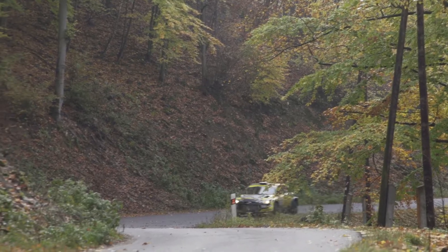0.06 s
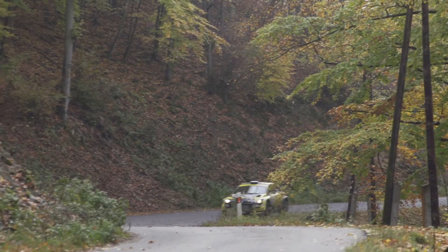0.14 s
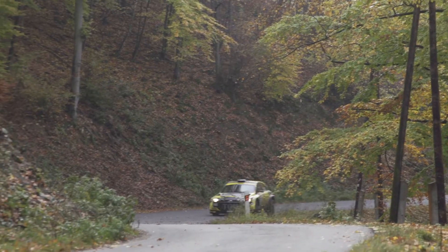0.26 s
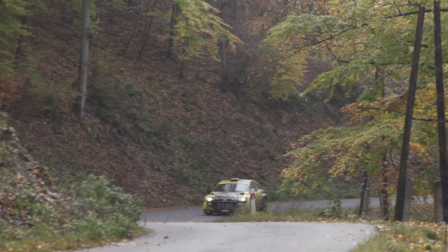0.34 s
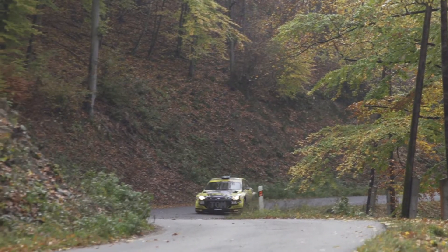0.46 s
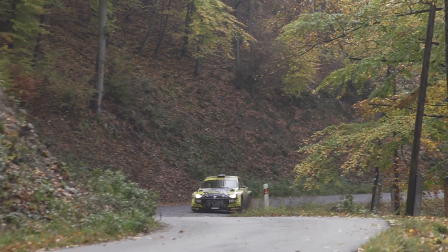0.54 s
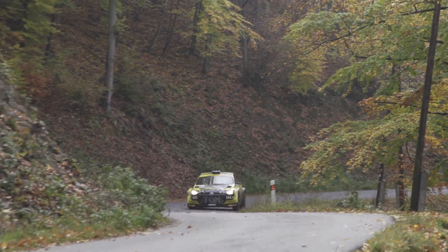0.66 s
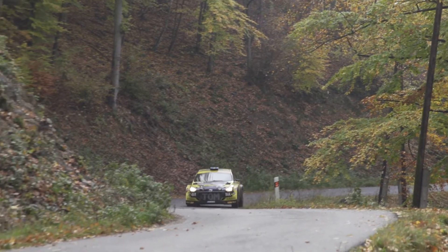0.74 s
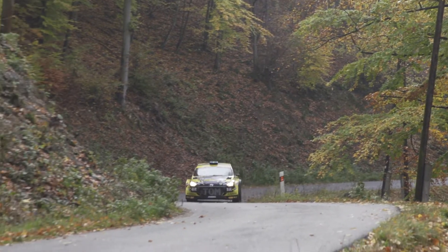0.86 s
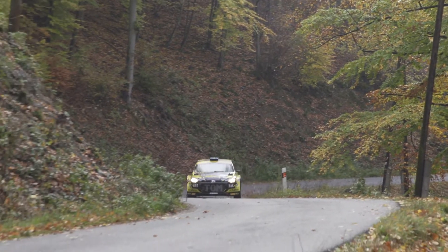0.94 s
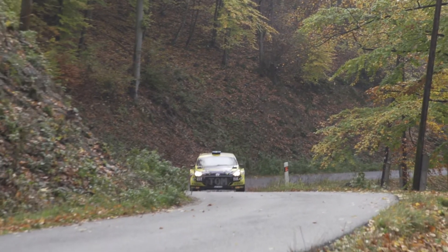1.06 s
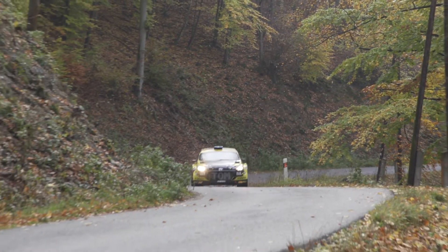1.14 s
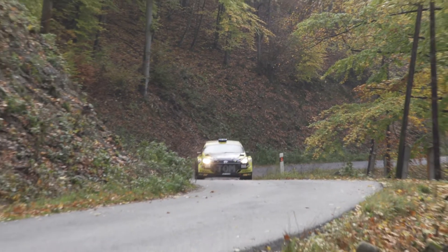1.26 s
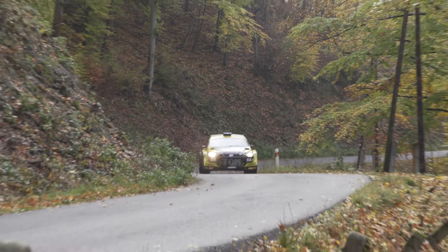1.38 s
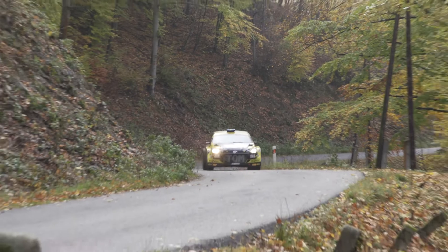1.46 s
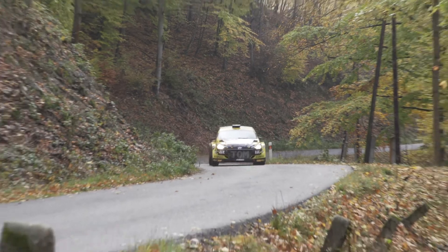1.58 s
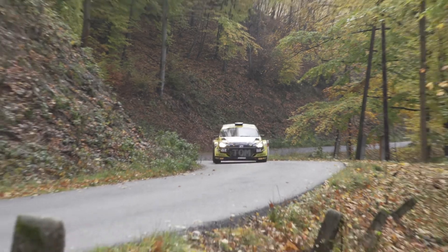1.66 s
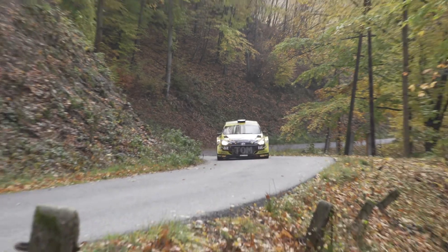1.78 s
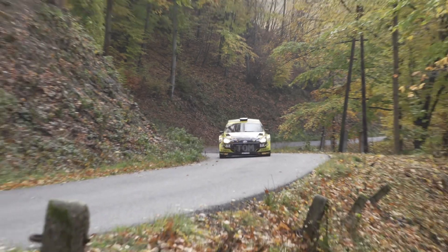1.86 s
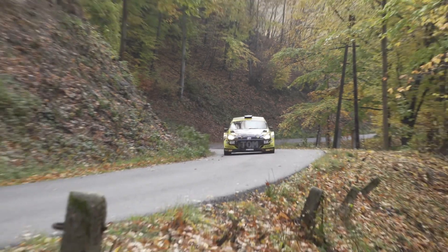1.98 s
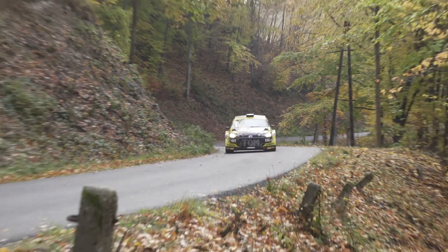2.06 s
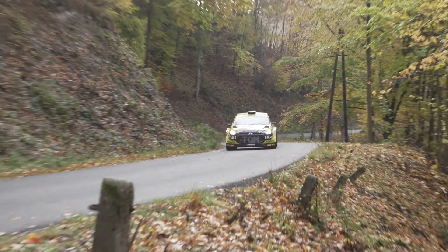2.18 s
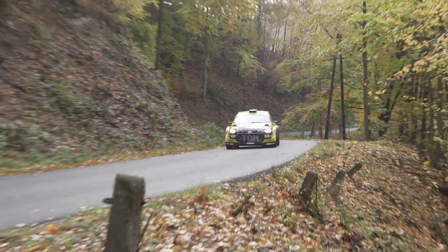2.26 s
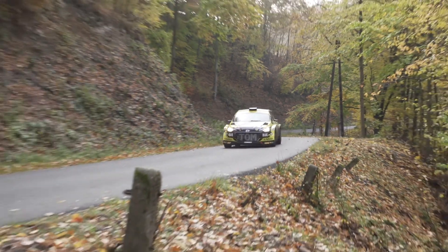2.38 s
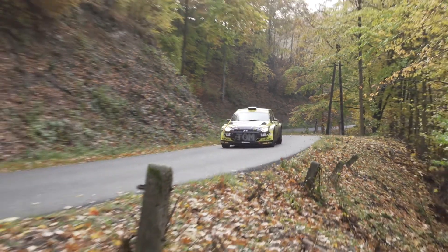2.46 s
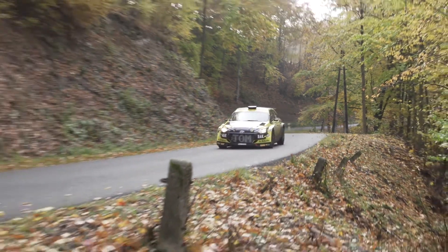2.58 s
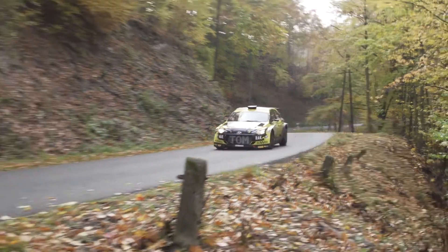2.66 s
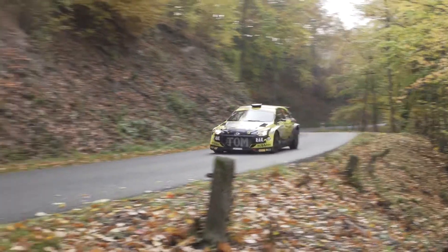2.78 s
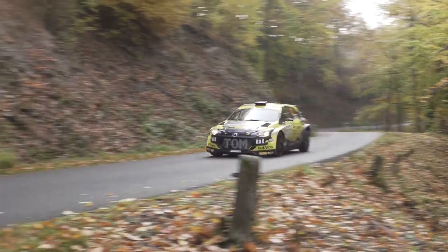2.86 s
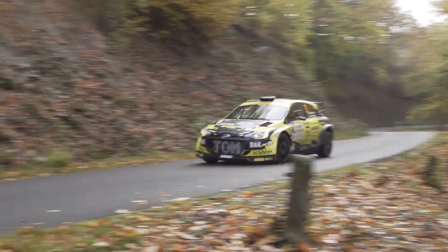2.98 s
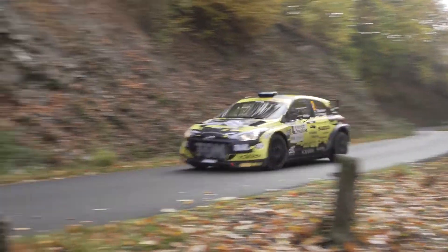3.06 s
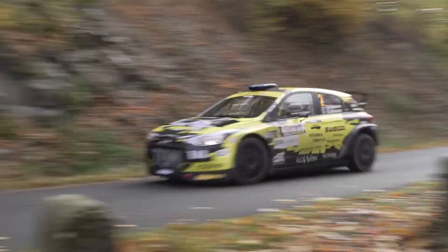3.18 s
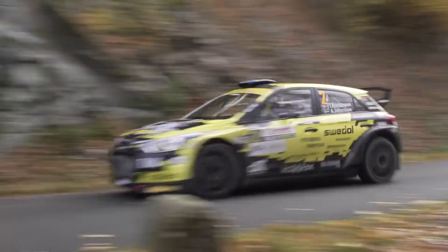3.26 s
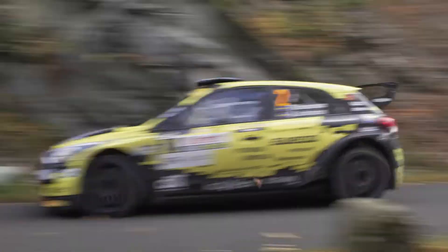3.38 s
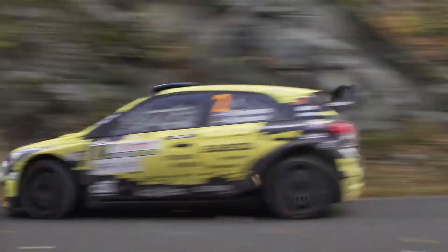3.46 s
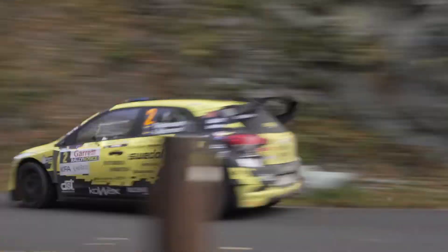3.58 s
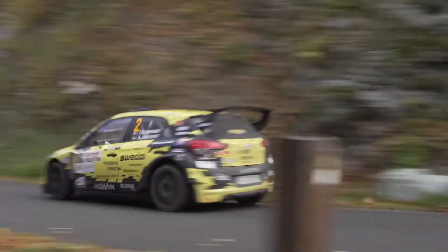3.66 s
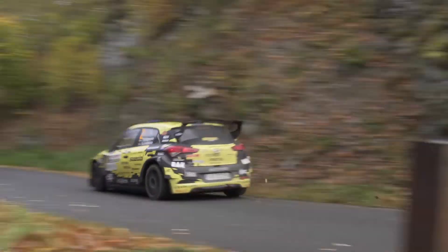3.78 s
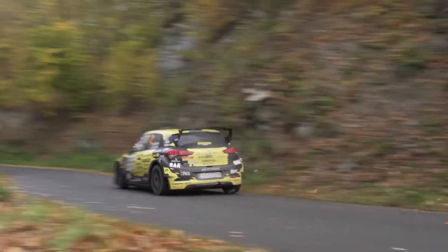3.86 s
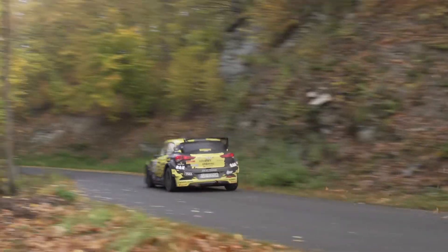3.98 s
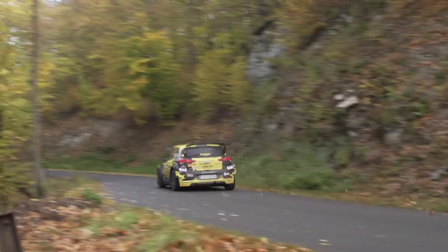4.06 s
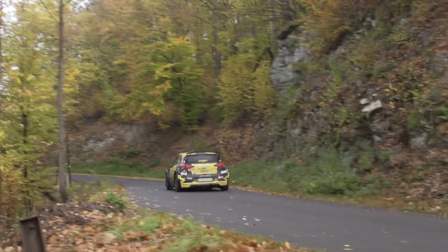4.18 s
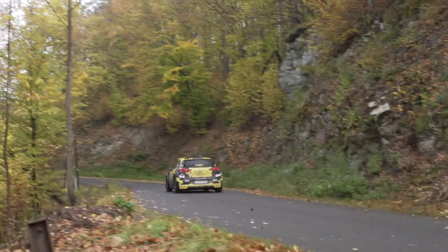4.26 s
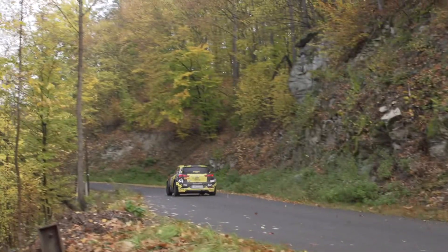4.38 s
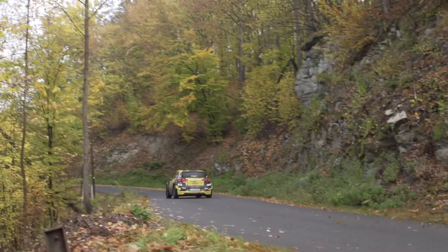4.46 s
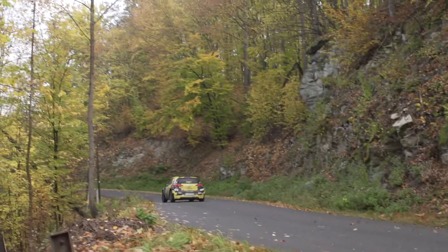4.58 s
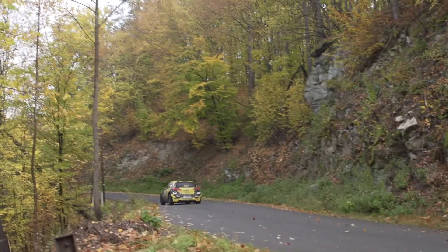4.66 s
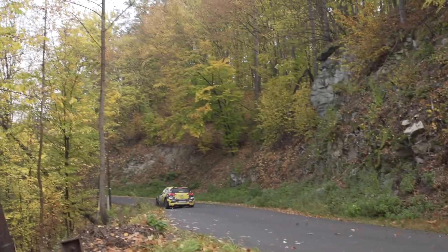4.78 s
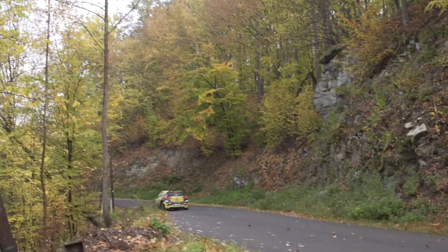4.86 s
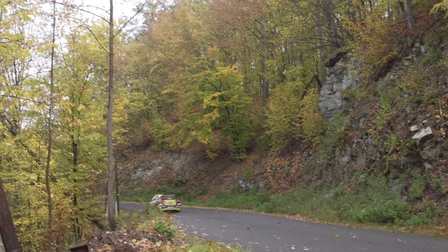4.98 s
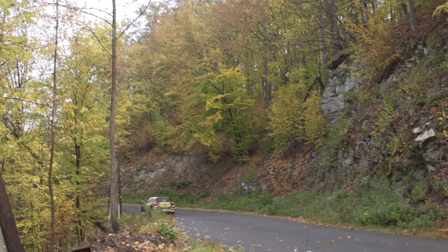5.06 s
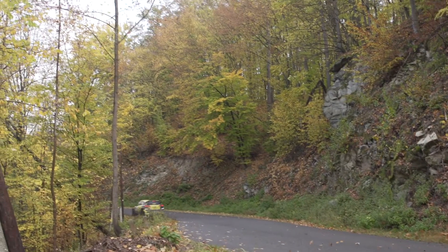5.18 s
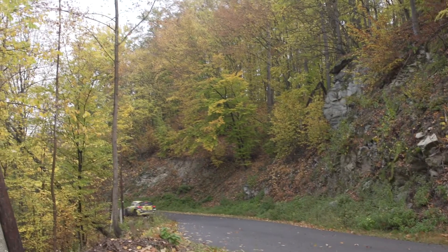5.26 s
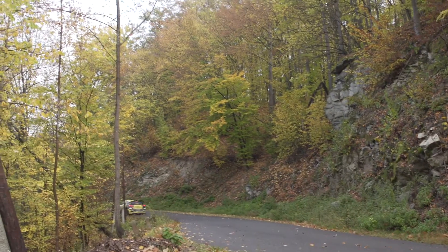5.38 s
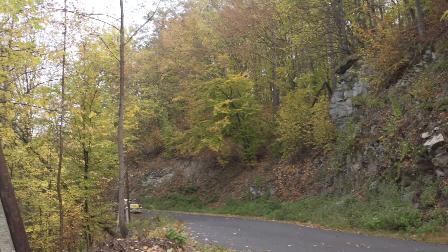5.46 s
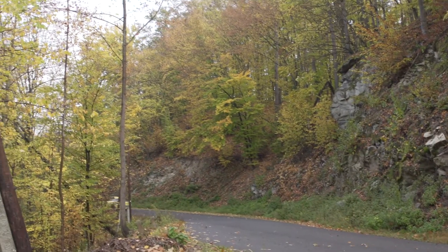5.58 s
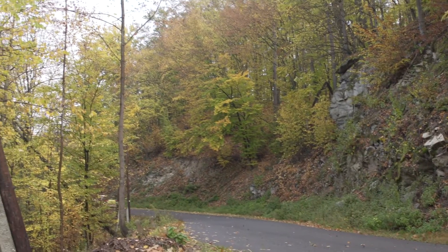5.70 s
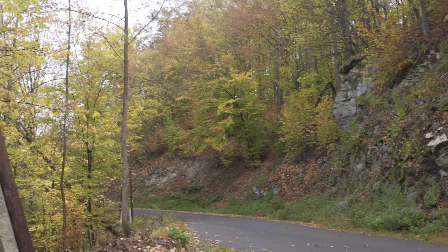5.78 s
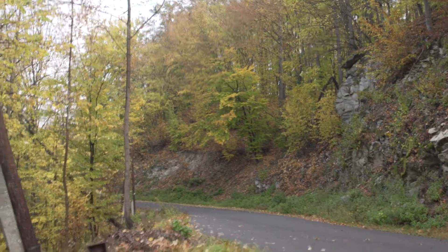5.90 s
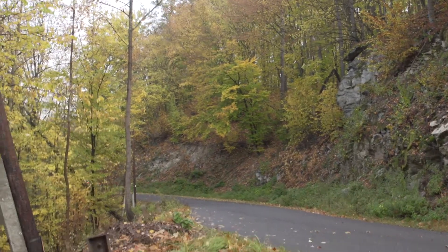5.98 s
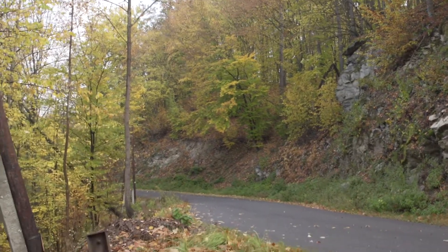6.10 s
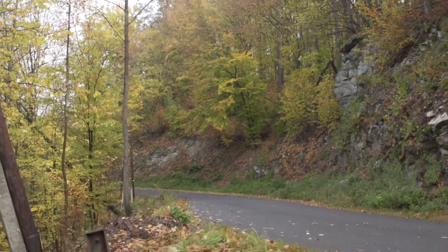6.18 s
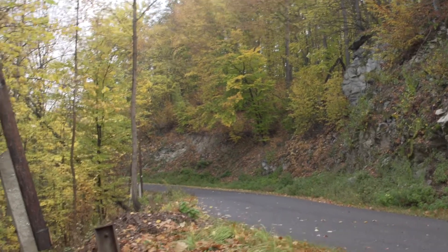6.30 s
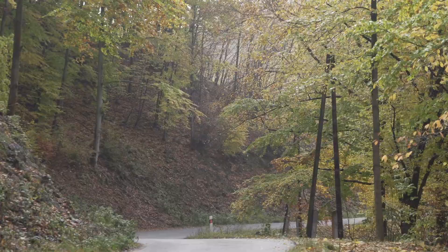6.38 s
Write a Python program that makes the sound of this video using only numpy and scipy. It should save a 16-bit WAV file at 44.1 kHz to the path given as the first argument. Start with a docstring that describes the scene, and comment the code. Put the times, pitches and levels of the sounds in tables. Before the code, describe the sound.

Outdoors on a forest road, over barely audible still air, a distant turbocharged rally engine drones nasally, its pitch climbing from 0 to 1.3 s. At about 1.4 s it drops with small cracks, and again near 1.8 s with a sharper crackle. Thin high squeals waver from 1.5 to 2.6 s, with spurts of fine grit; another lift and cracks come at 2.6-2.8 s. From 3 s the sound swells steeply, with a short squeal at 3.3 s, a whoosh of spray at 3.6 s and an overloading roar closest at 3.7 s, with two hard cracks. The deep, buzzing exhaust then recedes, echoing off slope and trees. A gear change thuds and dips at 5.1 s; weak squeals and cracks follow at 5.5-5.8 s, a dull pop at 6.2 s, and the car drops away abruptly at 6.35 s, leaving faint air.

```python
"""First a distant engine drones and roars over faint still air: a turbocharged four-cylinder rally car comes up
a forest road, changing up twice and lifting for a bend. Brakes and tyres squeal briefly, grit flies, and the
wooded slope answers. It passes close enough to overload the microphone and pulls away with one more gear change;
near the end the sound drops away abruptly. The exhaust is built from sine waves locked to the firings, the
squeals from wavering sines, and the gas, tyres, air, grit and cracks from coloured noise."""
import sys
import numpy as np
from scipy import signal
from scipy.fft import rfft, irfft, next_fast_len
from scipy.io import wavfile
from scipy.ndimage import uniform_filter1d, map_coordinates

SR = 44100
rng = np.random.default_rng(int(sys.argv[2]) if len(sys.argv) > 2 else 0)


def to_wav(s):
    """Save 16-bit WAV."""
    ch = np.atleast_2d(s).T  # columns
    pcm = np.round(np.clip(ch, -1, 1) * 32767)  # PCM
    wavfile.write(sys.argv[1], SR, pcm.astype(np.int16))


N = 283563
TIME = np.arange(N) / SR
PASS_S, END_S = 3.697, 6.349  # moment of closest approach; moment the car's sound drops away


def amp(db):
    """Decibels to gain."""
    return 10 ** (np.asarray(db) / 20)


def unit(x):
    """Scale to rms 1."""
    return x / np.sqrt(np.mean(x ** 2) + 1e-20)


def along(points, hz):
    """Read (Hz, value) points on a log axis."""
    f, v = np.transpose(points)
    return np.interp(np.log(hz + 1), np.log(f + 1), v)


def curves(rows):
    """One value per sample for each column after the time."""
    s, *cols = np.transpose(rows)
    return [np.interp(TIME, s, c) for c in cols]


def wobble(rate):
    """A smooth random curve around 0, with rate knots a second."""
    steps = np.arange(0, N + 64, 32)  # the curve is worked out every 32 samples
    knots = rng.standard_normal(int(N * rate / SR) + 8)
    return np.interp(np.arange(N), steps, map_coordinates(knots, [steps * rate / SR]))


def filtered(x, response):
    """Shape x by a gain that depends on frequency."""
    m = next_fast_len(N + SR // 4)
    spectrum = rfft(x, m) * response(np.fft.rfftfreq(m, 1 / SR))
    return irfft(spectrum, m)[:N]


def coloured(x, spectrum):
    """Shape x by a filter given as (Hz, dB) points."""
    return filtered(x, lambda hz: amp(along(spectrum, hz)))


def rush(spectrum, patchy_db):
    """Noise of rms 1 whose bands swell and sink in patches."""
    z = signal.stft(rng.standard_normal(N), nperseg=1024)[2]
    field = uniform_filter1d(rng.standard_normal(z.shape), size=4, axis=0)  # smooth across frequency
    field = uniform_filter1d(field, size=9, axis=1)  # smooth across time
    patchy = signal.istft(z * amp(patchy_db * unit(field)), nperseg=1024)[1][:N]
    return unit(coloured(patchy, spectrum))


def nearness(width):
    """1 as the car passes, falling to a half width seconds before and after."""
    return 1 / (1 + ((TIME - PASS_S) / width) ** 2)


DISTANCE_M, SPEED_M_PER_S = 6.34, 24.85  # from microphone to the car's line; road speed


def path():
    """At steady road speed: the loss with distance (dB) and the microphone's angle off the car's nose (degrees)."""
    ahead_m = SPEED_M_PER_S * (PASS_S - TIME)
    distance_db = 20 * np.log10(DISTANCE_M / np.hypot(DISTANCE_M, ahead_m))
    return distance_db, np.degrees(np.arctan2(DISTANCE_M, ahead_m))


def facing_away():
    """0 to 1 as the rear of the car turns towards the microphone."""
    return np.clip(.5 + (TIME - PASS_S) / .5, 0, 1)


ECHO_DB, ECHO_GROWS = -9, 0.51  # echo against direct sound at the pass; dB more for each dB lost to distance


def echo_share():
    """The farther the car, the more of its sound arrives by way of slope and trees."""
    return amp(ECHO_DB - ECHO_GROWS * path()[0])


def still_air():
    """The faint background of the forest: quiet noise, weaker towards the treble."""
    spectrum = [(40, -3), (450, 0), (2000, -5), (4500, -23), (6000, -34), (15000, -42)]  # (Hz, dB)
    return amp(-65.0) * rush(spectrum, patchy_db=2)


# How fast the cylinders fire, as it reaches the microphone with the Doppler shift included.
# Each row: time in seconds, firing rate in Hz.
FIRING_RATE = [(0, 181.4), (.25, 186.5), (.75, 211.1), (1.08, 219.9), (1.33, 223.4), (1.42, 186.9),
               (1.62, 182.5), (1.83, 160), (2.1, 168.5), (2.59, 166.5), (2.68, 146.6), (2.78, 157.6),
               (2.9, 150.7), (3.46, 151.3), (3.81, 145.3), (4.3, 148.6), (4.68, 157.5), (5.1, 153.8),
               (5.2, 165.8), (5.27, 145.2), (5.87, 150.8), (6, 140), (6.34, 140.7)]


def firing_phase(jitter):
    """Phase in radians, one turn for each firing, slightly unsteady."""
    return 2 * np.pi * np.cumsum(curves(FIRING_RATE)[0] * (1 + jitter * wobble(70))) / SR


# A low thudding rumble at each gear change or lift, while the exhaust note changes level.
# Each row: start in seconds, end in seconds, level of the thuds in dB, change of the exhaust note in dB.
LIFTS = [(0, .08, -49, -2.5), (1.36, 1.45, -55, 2.5), (1.78, 1.98, -52, -1), (2.62, 2.82, -45.5, -1.5),
         (5.05, 5.146, -41, -13)]
LIFT_EDGE_S = 0.021


def during(start, end):
    """1 during a gear change or lift, with short ramps."""
    return np.clip(np.minimum(TIME - start, end - TIME) / LIFT_EDGE_S + .5, 0, 1)


def note_change():
    """Gain of the exhaust note, which changes level during each gear change or lift."""
    return amp(sum(change * during(start, end) for start, end, db, change in LIFTS))


# Strength of the exhaust at the firing rate. Each row: time in seconds, base level in dB.
FIRST_ORDER = [(0.0, -48), (0.09, -43), (0.12, -55), (0.62, -46), (1.66, -47.5), (2.31, -40), (2.61, -30.5),
               (2.66, -41), (2.84, -27.5), (2.87, -35), (3.26, -19), (3.83, -13), (4.34, -23), (4.64, -22),
               (5.02, -24), (5.08, -54), (5.2, -30), (5.89, -36), (6.08, -58), (6.33, -45.5)]
# Strength at twice the firing rate. Each row: time in seconds, base level in dB.
SECOND_ORDER = [(0.0, -69), (0.63, -46), (0.85, -79), (1.97, -59.5), (2.34, -42), (3.01, -45), (3.21, -30),
                (3.26, -39), (3.44, -18.5), (3.52, -24.5), (3.7, -12.5), (3.81, -23), (3.91, -18),
                (5.04, -28), (5.09, -42.5), (5.87, -44), (6.03, -54), (6.33, -37)]


def exhaust_boom(phase):
    """The pressure fronts of the firings give two low tones, steadiest close by."""
    far = 1 - 0.73 * nearness(width=1.25)
    first = amp(curves(FIRST_ORDER)[0] + 3 + 2.4 * far * wobble(26)) * np.sin(phase)
    second = amp(curves(SECOND_ORDER)[0] + 2 + 2 * far * wobble(22)) * np.sin(2 * phase - .5)
    return (first + second) * note_change()


# Strength of the exhaust's overtones. Each row: time in seconds, base level in dB.
BARK_LEVEL = [(0.05, -44), (0.21, -48), (1.88, -41.5), (1.97, -52.5), (2.41, -37.5), (2.86, -44.5),
              (3.23, -23.5), (3.26, -35), (3.35, -25.5), (3.73, -17.5), (3.92, -22), (4.1, -22),
              (4.43, -32.5), (4.5, -26), (4.71, -34), (4.92, -35), (5.32, -51), (5.9, -37.5), (6.11, -58),
              (6.32, -45)]
# Resonances that colour the overtones, heard from the front. Each row: frequency in Hz, gain in dB.
FRONT_COLOUR = [(450, 2.5), (600, -2.5), (660, -24), (760, -11.5), (870, -2), (1070, -46), (1220, -2.5),
                (1350, -6), (2400, -22)]
# The same heard from behind. Each row: frequency in Hz, gain in dB.
REAR_COLOUR = [(440, 0), (590, -2), (735, -4.5), (830, -17.5), (930, -1.5), (1030, -20), (1180, -30.5),
               (1360, -11), (1700, -35.5), (2200, -11.5), (2500, -11.5)]


def exhaust_bark(phase, rough, flutter_db, uneven_db):
    """Each firing is a steep pressure front, so its note carries many ragged overtones."""
    rear, firing_hz = facing_away(), curves(FIRING_RATE)[0]
    ragged = phase + rough * wobble(260)
    bark = np.zeros(N)
    for order in np.arange(3, 17):
        hz = order * firing_hz
        db = (1 - rear) * along(FRONT_COLOUR, hz) + rear * along(REAR_COLOUR, hz)
        bark += amp(db + flutter_db * wobble(18)) * np.sin(order * ragged)
        # unequal cylinders put weak lines halfway between the orders
        bark += amp(db / 2 + uneven_db) * wobble(25) * np.sin((order + .5) * phase)
    return amp(curves(BARK_LEVEL)[0] - 5 + 2.4 * nearness(width=0.4)) * bark * note_change()


def steady_orders(phase, level_db):
    """Close by, the third and fourth orders of the exhaust note sound steadily, and from behind the fifth too."""
    tones = amp(1.3 * wobble(14)) * np.sin(4 * phase + np.pi / 3)
    tones += amp(-8 + 1.5 * wobble(8.4)) * np.sin(3 * phase)
    tones += facing_away() * nearness(width=0.69) * amp(-10.5 + 1.5 * wobble(14)) * np.sin(5 * phase)
    return amp(curves(BARK_LEVEL)[0] + level_db) * nearness(width=0.75) * tones * note_change()


# Colour of the air droning in the airbox. Each row: frequency in Hz, level in dB per Hz.
AIRBOX = [(250, -48), (340, -1.5), (375, 8), (440, -2), (510, -10), (570, 2.5), (700, -43)]
INTAKE_DB, INTAKE_DB_PER_DEG = -25.5, -1.0  # base level straight ahead; change per degree off that line


def intake(phase):
    """Air drones in the airbox, growling on the fifth multiple of the crank speed; heard only from the front."""
    crank = phase / 2  # two firings for each turn
    growl = amp(2 + 2.5 * wobble(25)) * np.sin(5 * crank + wobble(30) / 2)
    drone = amp(2.5) * rush(AIRBOX, patchy_db=3.0)
    distance_db, angle_deg = path()
    return amp(INTAKE_DB + distance_db + INTAKE_DB_PER_DEG * angle_deg) * (growl + drone)


# How hard the engine works. Each row: time in seconds, effort in dB.
EFFORT = [(0, 0.5), (.07, 3.5), (.3, -4.5), (.78, -3.5), (1.07, 0.5), (1.78, -2.5), (1.95, -4), (2.2, -1),
          (2.56, 0.5), (2.72, -5.5), (3, -5), (3.2, 1), (4.05, -1.5), (4.97, 0), (5.17, -8.5), (5.55, -8.5),
          (5.7, -2.5), (5.96, -0.5), (6.09, -9), (6.33, -7.5)]


def radiated(level_db, head_on_db, cone_deg, follows):
    """Gain of a sound of the car: less with distance and in the cone the body screens, following effort."""
    distance_db, angle_deg = path()
    screened_db = head_on_db * np.exp(-(angle_deg / cone_deg) ** 2)
    return amp(level_db + distance_db + screened_db + follows * curves(EFFORT)[0])


def repeating(x, share):
    """Each firing's gas burst partly repeats the one before, which draws ridges on the orders."""
    before = map_coordinates(x, [np.arange(N) - SR / curves(FIRING_RATE)[0]], order=3)
    return unit(x + share * before)


# Colour of the broad roar. Each row: frequency in Hz, level in dB per Hz.
ROAR = [(30, -35.5), (90, -10), (200, -1), (400, -2), (700, -1), (1000, -6.5), (1400, -3), (2000, -7),
        (3000, -33), (6000, -50)]
# Colour of the higher rasp. Each row: frequency in Hz, level in dB per Hz.
RASP = [(600, -45), (1400, -1), (2000, 2), (2700, 0), (3500, -1), (4300, -2), (5000, -9.5), (5800, -26),
        (8000, -41), (11000, -68)]


def gas(phase, chop):
    """Turbulent gas roars and rasps, pulsing with the firings."""
    puffs = unit(1 + chop * np.cos(phase - .8) + 0.059 * wobble(150))
    roar = repeating(rush(ROAR, patchy_db=2), share=0.31)
    roar *= radiated(level_db=-21.5, head_on_db=-3.5, cone_deg=28, follows=0.87)
    rasp = repeating(rush(RASP, patchy_db=2.0), share=0.1)
    rasp *= radiated(level_db=-23.5, head_on_db=-1.0, cone_deg=9.3, follows=1.0)
    return (roar + rasp) * puffs


# Colour of the tyre hiss. Each row: frequency in Hz, level in dB per Hz.
HISS = [(3000, -4.5), (6000, -15), (8700, -0.5), (10000, -10), (12000, -9), (13000, -29), (15500, -38)]


def tyres():
    """The tyres hiss on the asphalt."""
    return radiated(level_db=-35, head_on_db=-7.5, cone_deg=12.6, follows=1.3) * rush(HISS, patchy_db=-2.5)


# Colour of the wake's rumble. Each row: frequency in Hz, level in dB per Hz.
RUMBLE = [(15, -27), (45, -9.5), (80, -5), (130, 4.5), (300, -7), (800, -53)]


def wake():
    """The wake buffets in low rumbling noise, strongest as the car sweeps by."""
    level = radiated(level_db=-39.5, head_on_db=-4.5, cone_deg=22, follows=-0.61)
    return level * amp(8.3 * nearness(width=0.29)) * rush(RUMBLE, patchy_db=2.5)


# Colour of the thudding rumble. Each row: frequency in Hz, level in dB per Hz.
THUD = [(15, -16), (45, -4), (80, 0), (130, -2), (300, -20), (800, -55), (4000, -90)]


def lift_thuds():
    """A low thudding rumble, made of deep noise, sounds during each gear change or lift."""
    flow = sum(amp(db) * during(start, end) for start, end, db, change in LIFTS)
    return flow * rush(THUD, patchy_db=0)


# Colour of air and spray around the car. Each row: frequency in Hz, level in dB per Hz.
WHOOSH = [(500, -33), (3000, -3.5), (5800, -3), (9000, 0.5), (12000, 0.5), (15500, -14)]
WHOOSH_DB, WHOOSH_WIDTH_S = -35.5, 0.53  # at the pass; time to a quarter of its gain on either side
# the rear wheel's plume sweeps across the microphone
PLUME_S, PLUME_DB, PLUME_RISE_S, PLUME_FALL_S = 3.6, -29, 0.055, 0.032


def whoosh(spiky_db):
    """Air and fine spray rush past, peaking sharply as the rear wheel goes by."""
    age = TIME - PLUME_S
    plume = amp(PLUME_DB) * np.exp(-np.maximum(-age / PLUME_RISE_S, age / PLUME_FALL_S))
    air = amp(WHOOSH_DB) * nearness(WHOOSH_WIDTH_S) ** 2
    return (plume + air) * unit(rush(WHOOSH, patchy_db=2.5) * amp(spiky_db * wobble(300)))


def slope(x, delay, echo_db):
    """Long waves return off the slope and beat with the gliding note; close by, the direct path drowns them."""
    back = np.interp(TIME - delay, TIME, x, left=0) * echo_share() * amp(echo_db)
    return x + back * (1 - nearness(width=0.63)) * wobble(16)


# How long the forest rings. Each row: frequency in Hz, time to fade by 60 dB in seconds.
FOREST_FADE = [(150, 1), (1000, 0.93), (5000, 0.16), (12000, .2)]


def forest(x):
    """Trunks and slope scatter the sound; the farther the car, the greater their share."""
    hz, t, z = signal.stft(rng.standard_normal(SR), SR, nperseg=256)
    fading = z * amp(-60 * t / along(FOREST_FADE, hz)[:, None])
    tail = signal.istft(fading, SR, nperseg=256)[1]
    tail /= np.sqrt(np.mean(np.abs(rfft(tail, SR)[100:3000]) ** 2))  # average gain 1 from 100 to 3000 Hz
    wet = echo_share()
    return (x + signal.fftconvolve(x * wet, tail)[:N]) / np.sqrt(1 + wet ** 2)


def bursts(rows, spectrum, t60):
    """Sudden puffs of coloured noise that die away."""
    envelope = np.zeros(N)
    for s, db in rows:
        first = round(s * SR)
        age = TIME[:N - first]
        envelope[first:] += amp(db - 60 * age / t60) * (1 - np.exp(-60 * age / t60))
    return envelope * rush(spectrum, patchy_db=5.5)


# Sharp exhaust cracks and stones hitting the underbody. Each row: start in seconds, base level in dB.
CRACKS = [(1.41, -30), (1.465, -26), (1.775, -21.5), (1.796, -15), (1.812, -25), (2.609, -21),
          (2.705, -21.5), (2.797, -23.5), (3.717, -13), (3.744, -8.5), (5.631, -26), (5.685, -24)]
# Colour of a crack. Each row: frequency in Hz, level in dB per Hz.
CRACK_COLOUR = [(150, -25), (700, -7), (1800, 3), (4300, -5), (5800, -25.5), (15000, -35)]


def cracks():
    """Exhaust cracks and stone hits are very short bursts of noise."""
    return amp(-8) * bursts(CRACKS, CRACK_COLOUR, t60=0.024)


# Brake and tyre squeals. Each row: start in seconds, end in seconds, pitch in Hz, base level in dB,
# waver as a share of the pitch.
SQUEALS = [(1.48, 1.702, 3132, -54, .006), (1.978, 2.569, 2860, -53, 0.00306),
           (1.98, 2.42, 4260, -53.5, 0.0072), (2.48, 2.66, 1680, -42, .048),
           (3.27, 3.42, 1220, -35, 0.0079), (5.463, 5.8, 1171, -48, 0.044),
           (5.64, 5.816, 1870, -43.5, 0.082), (5.61, 5.74, 2730, -49.5, .05)]


def squeals():
    """Stick-slip tones that swell, waver and let go."""
    out = np.zeros(N)
    for start, end, hz, db, waver in SQUEALS:
        progress = np.clip((TIME - start) / (end - start), 0, 1)
        swell = np.sqrt(np.abs(np.sin(np.pi * progress)))
        pitch = hz * (1 + waver * wobble(120))
        out += amp(db + 5.5 + 2.3 * wobble(30)) * swell * np.sin(2 * np.pi * np.cumsum(pitch) / SR)
    return out


# The tyres fling grit and spray.
# Each row: start in seconds, start of the fade in seconds, level at the distance of the pass in dB.
SPURTS = [(1.74, 1.93, -38), (2.02, 2.3, -33), (2.46, 2.646, -32), (2.684, 2.74, -34), (2.793, 2.998, -44),
          (3.05, 3.25, -36)]
# Colour of the spray. Each row: frequency in Hz, level in dB per Hz.
SPRAY = [(6000, -21), (9000, 1.5), (12000, 2), (13000, -8), (15500, -11.5)]
SPURT_ATTACK_S, SPURT_RELEASE_S = .03, 0.079


def grit(spiky_db):
    """Fine spray leaves the treads in spurts that start quickly, hold and die away."""
    flow = np.zeros(N)
    for start, end, db in SPURTS:
        attack = np.clip((TIME - start) / SPURT_ATTACK_S, 0, 1)
        flow += amp(db) * attack * np.exp(-np.maximum(TIME - end, 0) / SPURT_RELEASE_S)
    return flow * amp(path()[0]) * unit(rush(SPRAY, patchy_db=5.5) * amp(spiky_db * wobble(370)))


# A dull, distant exhaust pop. Each row: start in seconds, base level in dB.
FAR_POPS = [(6.183, -26)]
# Colour of the pop. Each row: frequency in Hz, level in dB per Hz.
POP_COLOUR = [(60, -25), (200, 2), (500, 9), (750, 1), (1200, -15), (4000, -41.5)]


def far_pops():
    """A distant exhaust pop is a short burst of duller noise."""
    return bursts(FAR_POPS, POP_COLOUR, t60=0.034)


def scene():
    """The car between slope and trees, swelling as it passes, over faint still air."""
    phase = firing_phase(jitter=.002)
    boom = slope(exhaust_boom(phase), delay=0.19, echo_db=-8.5) * amp(3.5 * nearness(width=0.49))
    bark = exhaust_bark(phase, rough=0.044, flutter_db=3, uneven_db=-10)
    engine = boom + steady_orders(phase, level_db=0.5) + gas(phase, chop=0.084)
    scattered = forest(bark + intake(phase) + squeals() + cracks())
    thuds = lift_thuds() + far_pops()
    air_and_road = tyres() + wake() + whoosh(spiky_db=2.5) + grit(spiky_db=2)
    car = engine + scattered + thuds + air_and_road
    heard = np.clip((END_S - TIME) / 0.0052, 0, 1)  # the abrupt drop near the end
    return (car * heard + still_air())[None]


# The microphone's top end. Each row: frequency in Hz, gain in dB.
MICROPHONE = [(4500, -1.5), (5800, -1.5), (9000, -8), (10500, -15.5), (15000, -6.5)]
TOP_HZ = 15720  # nothing passes from here up


def record(dry, ceiling=0.42, hardness=10.0):
    """The input stage flattens the loudest peaks; the top end is dull and band-limited."""
    clipped = dry[0] / (1 + np.abs(dry[0] / ceiling) ** hardness) ** (1 / hardness)
    return filtered(coloured(clipped, MICROPHONE), lambda hz: hz < TOP_HZ)[None]


dry = scene()
out = record(dry)
to_wav(out)
```